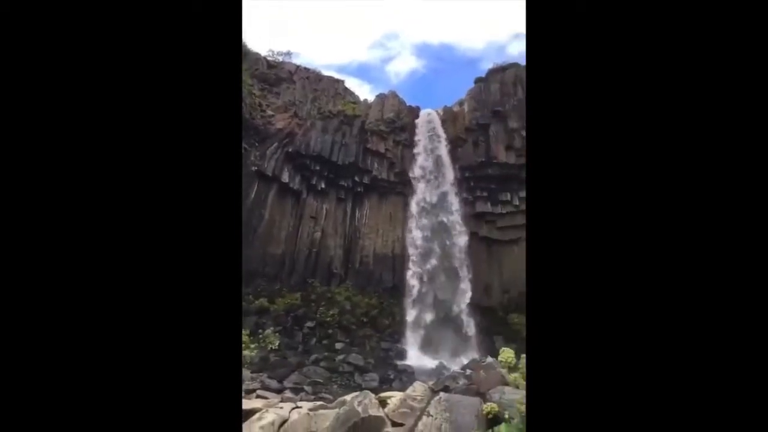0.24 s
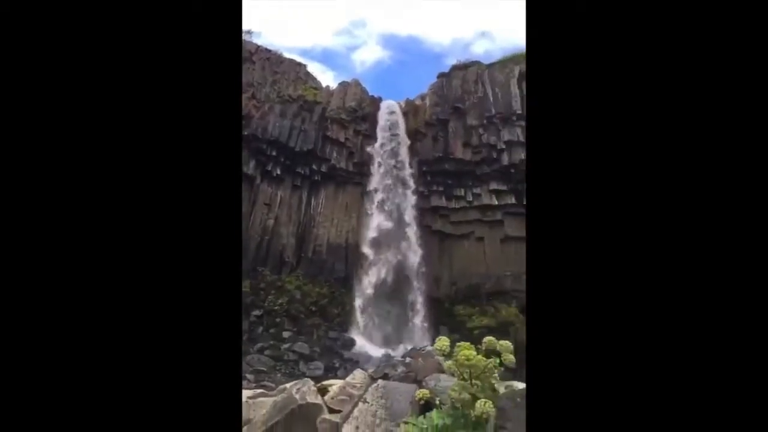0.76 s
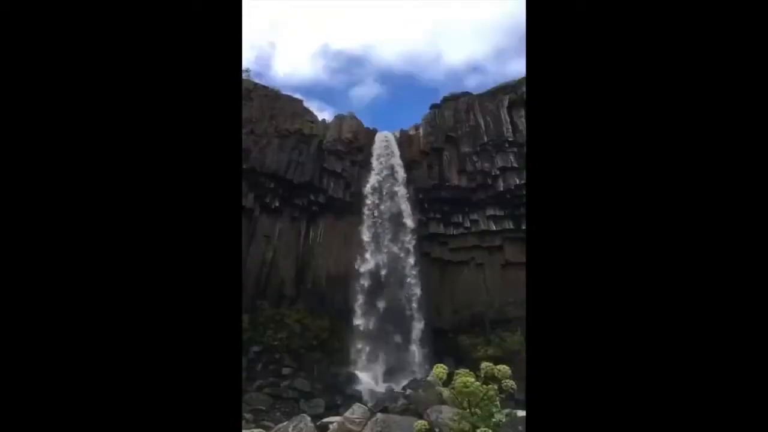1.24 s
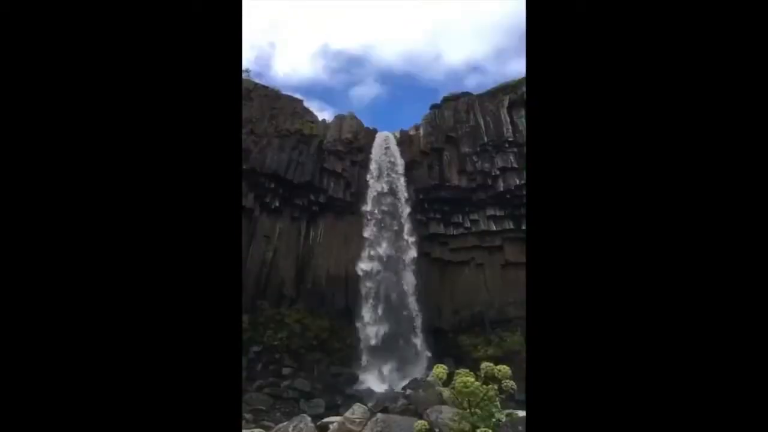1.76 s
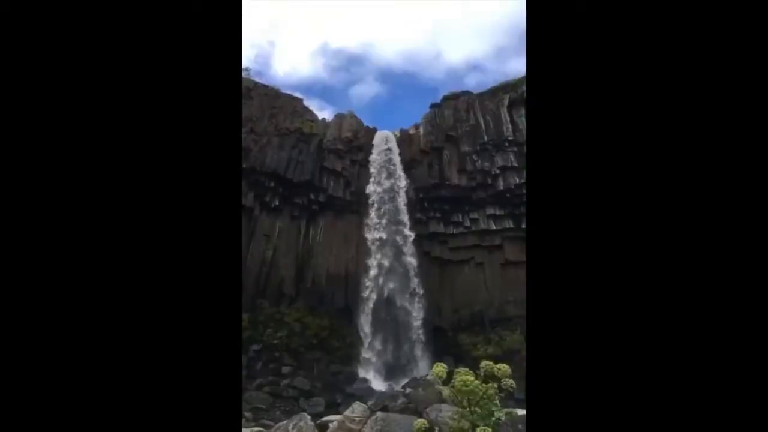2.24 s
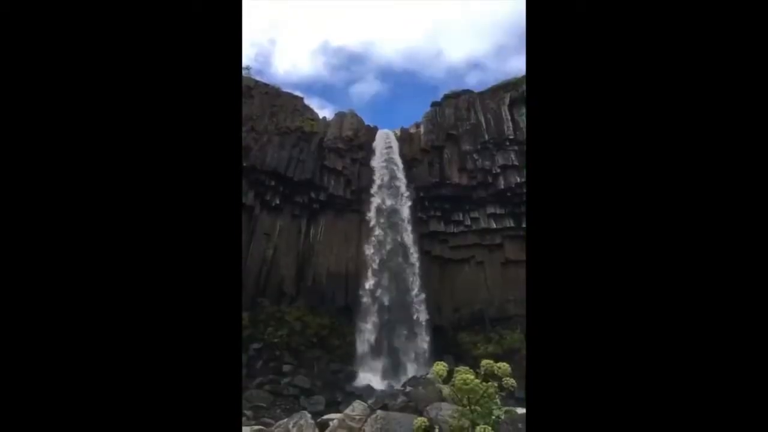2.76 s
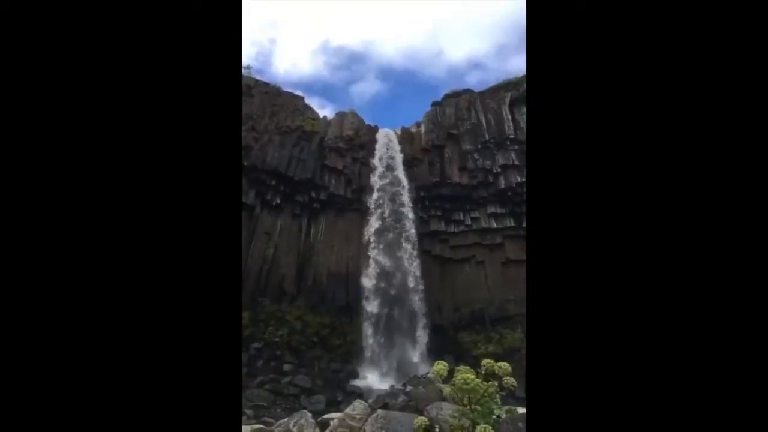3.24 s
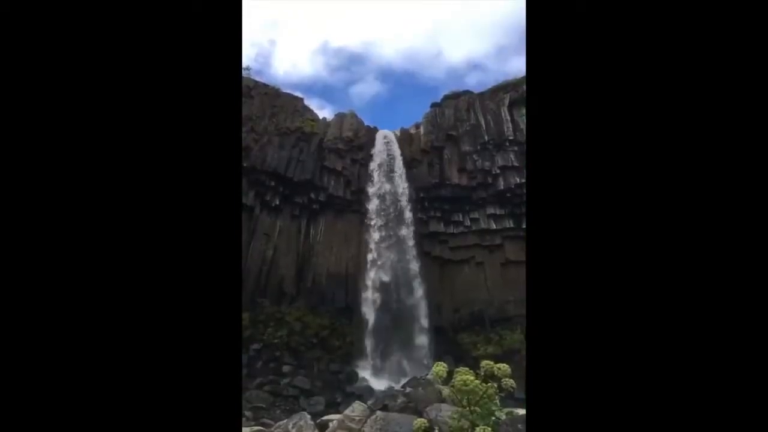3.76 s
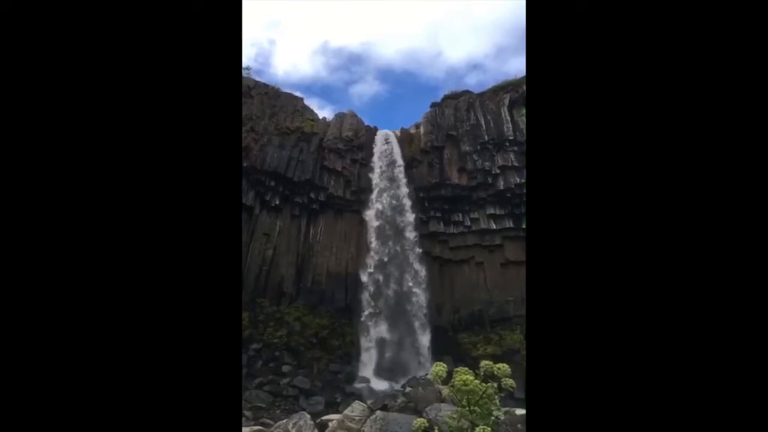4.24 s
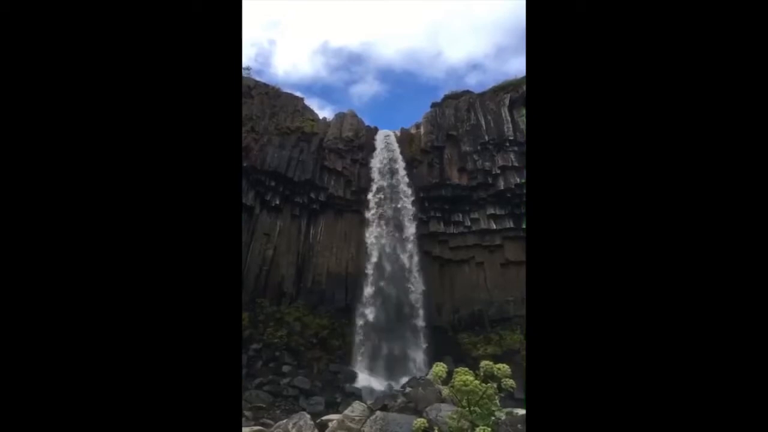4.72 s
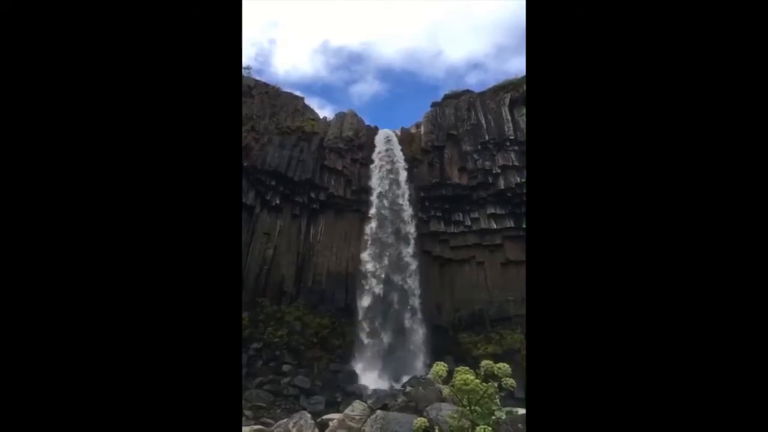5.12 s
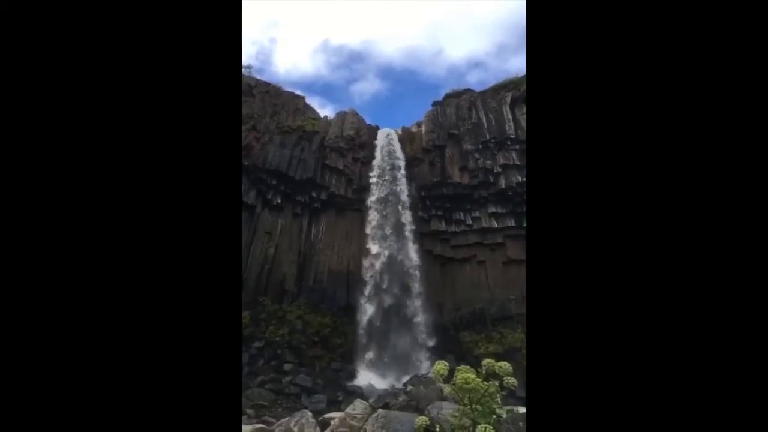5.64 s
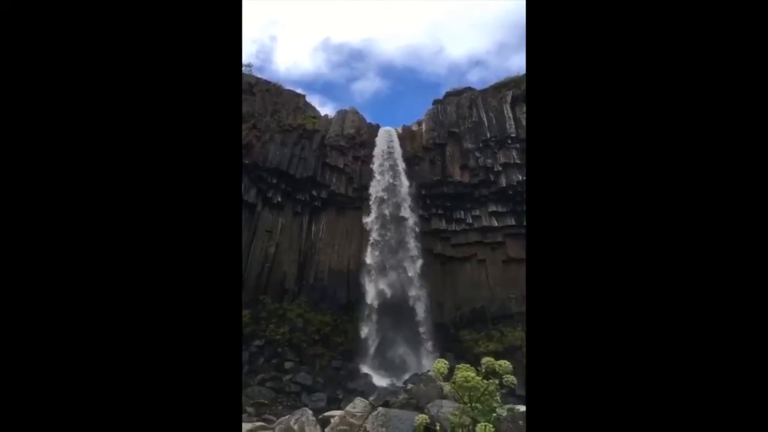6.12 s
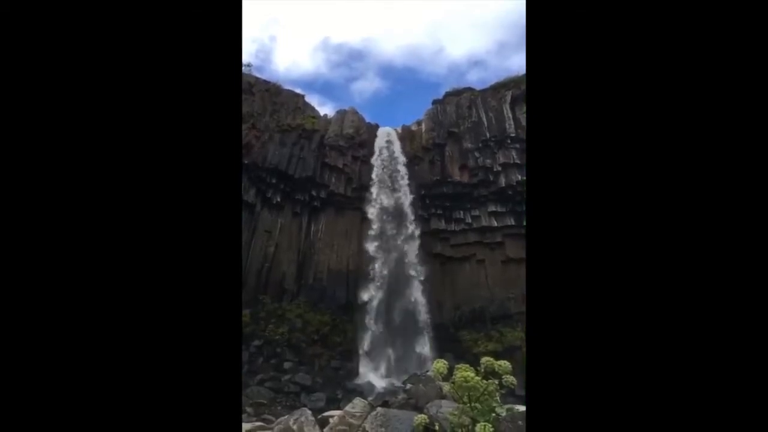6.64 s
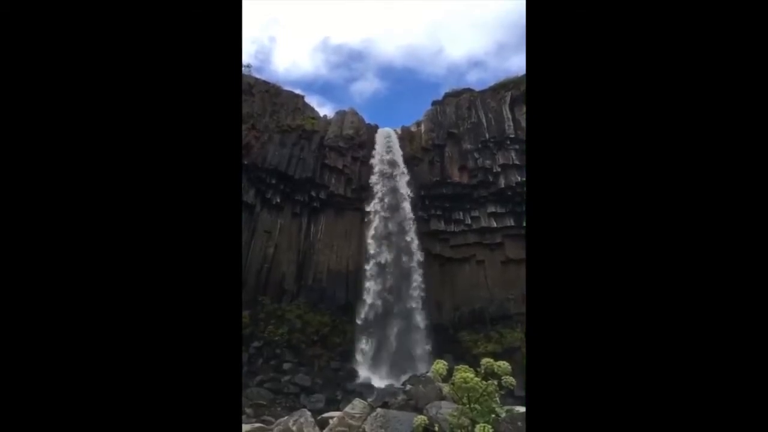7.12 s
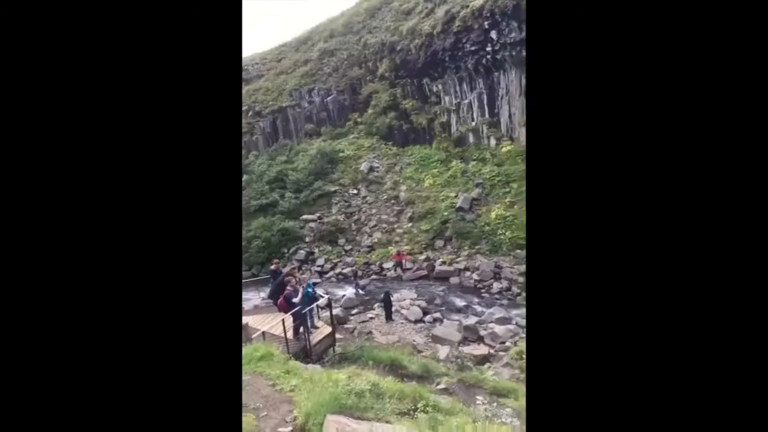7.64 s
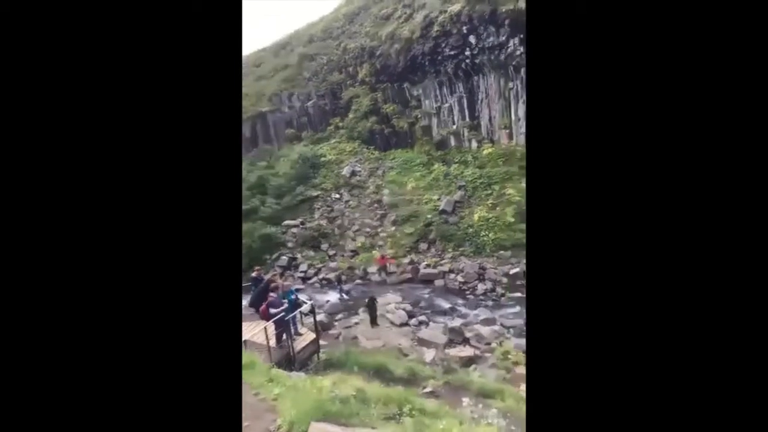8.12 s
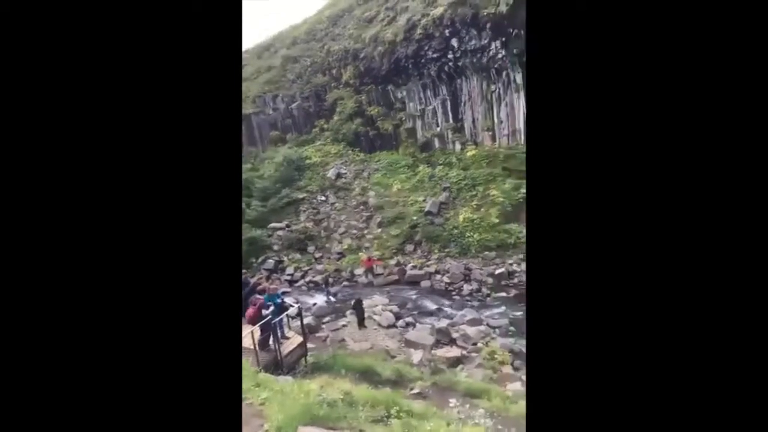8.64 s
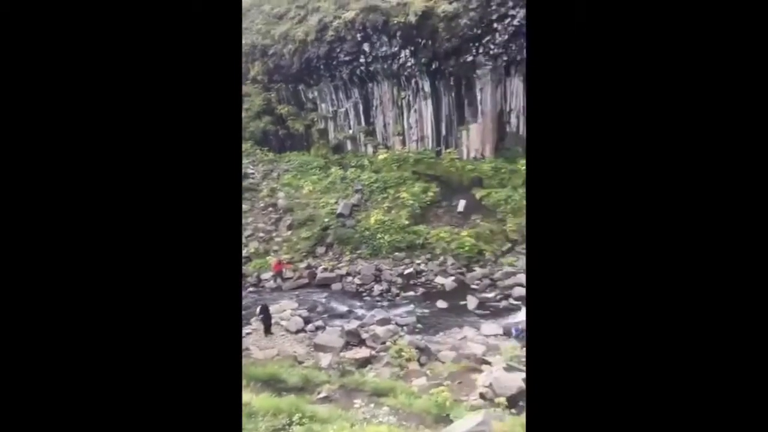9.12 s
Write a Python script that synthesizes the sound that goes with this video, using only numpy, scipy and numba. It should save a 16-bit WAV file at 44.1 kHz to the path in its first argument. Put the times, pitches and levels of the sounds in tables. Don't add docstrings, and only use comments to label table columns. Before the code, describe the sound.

Dense rushing and splattering of falling water with low wind thumps, cut hard by a short dropout and a longer silent pause before a muffled final stretch.

```python
import sys
import numpy as np
from scipy import signal
from scipy.fft import rfft, irfft, next_fast_len
from scipy.io import wavfile
from scipy.ndimage import uniform_filter1d
from numba import njit

SR = 44100
rng = np.random.default_rng(int(sys.argv[2]) if len(sys.argv) > 2 else 0)


def unload_wav(signal):
    wavfile.write(
        sys.argv[1],
        SR,
        np.round(np.clip(np.atleast_2d(signal).T, -1, 1) * 32767).astype(np.int16),
    )


def rack_gain(trim_db):
    fader = np.asarray(trim_db, float)
    return 10 ** (fader / 20)


N = 413658


def unit(x):
    return x / np.sqrt(np.mean(x ** 2))


def walk(n, rate):
    k = int(SR / rate)
    held = np.repeat(rng.standard_normal(n // k + 1), k)
    return 1.32 * uniform_filter1d(uniform_filter1d(held, k), k)[:n]


def band(x, lo_hz, hi_hz):
    f = np.fft.rfftfreq(len(x), 1 / SR)
    return irfft(rfft(x) * ((f >= lo_hz) & (f < hi_hz)), len(x))


def curve(table, t):
    s, *columns = np.transpose(table)
    return [np.interp(t, s, c) for c in columns]


def ticks():
    # t/s, level/dB, low f/Hz, high f/Hz, length/s
    bursts = [
        (7.202, -30, 3000, 13000, .0012),
        (7.2034, -27.5, 2000, 13500, 0.0017),
        (8.6075, -23, 500, 3490, 0.0076),
    ]
    out = np.zeros(N)
    for s, db, lo, hi, length in bursts:
        u = np.arange(-512, 512) / SR
        burst = unit(band(rng.standard_normal(1024), lo, hi)) * np.exp(-(2 * u / length) ** 2)
        middle = int(s * SR)
        out[middle - 512:middle + 512] += rack_gain(db) * burst
    return out


@njit
def ring(n, at, hz, cycles, size, glide):
    y = np.zeros(n + 8000)
    for k in range(len(at)):
        life = min(cycles[k] * SR / hz[k], 2500.)
        p = np.exp(2j * np.pi * hz[k] / SR - 2 / life)
        turn = np.exp(2j * np.pi * glide * hz[k] / SR / life)
        z = size[k] + 0j
        for i in range(int(3 * life)):
            y[at[k] + i] += z.imag
            z, p = z * p, p * turn
    return y[:n]


def froth(n, per_second=5000, spread_db=2.5, bubble_db=0.5):
    when, pitch, loudness, ringing = rng.random((int(per_second * n / SR), 4)).T
    hz = 300 * 14 ** (pitch ** .8)
    size = rack_gain(np.minimum(-spread_db * np.log(1 - loudness), 9))
    bubbles = ring(n, (when * n).astype(np.int64), hz, 5.0 + 16 * ringing, size, .06)
    far = rng.standard_normal(n)
    return rack_gain(bubble_db) * unit(bubbles) * 0.46 + far


def gusty(water, gust_db, steady=0.68):
    rumble = band(water, 0, 150)
    power = uniform_filter1d(rumble ** 2, 2600) / rack_gain(2 * gust_db)
    return water + rumble * ((power + .05) ** (-steady / 2) - 1)


def waterfall(t, roar, spray, spray_db, zone_db, flicker_db=1.36, shared_db=0.67):
    # low f/Hz, high f/Hz
    zones = [
        (20, 150),
        (200, 1800),
        (1800, 5500),
        (5500, 14000),
    ]
    n = len(t)
    f = np.fft.rfftfreq(n, 1 / SR) + 1e-3
    low, high = np.array(roar), np.array(spray) + [0, spray_db]
    shape = np.vstack([low[low[:, 0] < 1850], high[high[:, 0] >= 1850]])
    colour = rack_gain(np.interp(np.log(f), np.log(shape[:, 0]), shape[:, 1])) * (f < 15270)
    gain_db = []
    for db, (lo, hi) in zip(zone_db, zones):
        power = np.sum(colour[(f > lo) & (f < hi)] ** 2) / len(f)
        gain_db.append(db - 10 * np.log10(power))
    spectrum, shared, out = rfft(froth(n)), walk(n, 9), 0
    for centre in np.arange(0, 10.1, 1 / 3):
        mask = np.cos(np.pi / 2 * np.clip(3 * (np.log2(f / 16) - centre), -1, 1)) ** 2
        white = spectrum * np.sqrt(n * np.sum(mask) / np.sum(mask * abs(spectrum) ** 2))
        place = np.interp(centre, [3.1, 3.9, 6.5, 7.0, 8.2, 8.6], [0.5, 1, 1, 2, 2.5, 3])
        k = min(int(place), 2)
        surge_db = gain_db[k] + (place - k) * (gain_db[k + 1] - gain_db[k])
        shared = 0.73 * shared + 0.49 * walk(n, 11)
        db = surge_db + shared_db * shared + flicker_db * walk(n, 24.98)
        out = out + rack_gain(db) * irfft(white * mask * colour, n)
    return gusty(out, zone_db[0])


def scene():
    # start t/s, end t/s
    spots = [
        (0, .9628),
        (1.0105, 7.1942),
        (7.7652, 9.38),
    ]
    # t/s, roar level/dB, spray level/dB, mist level/dB
    surges = [
        [(0.0, -29.5, -33, -38), (0.162, -32.5, -33.5, -39), (0.172, -34.5, -38, -38.5),
         (0.25, -34, -33, -36.5), (0.608, -31.5, -33.5, -38), (0.692, -31, -34, -37), (0.734, -34, -34, -41),
         (0.742, -34, -33, -43), (0.772, -30.5, -32, -40), (0.838, -30.5, -38, -38), (0.868, -33.5, -34.5, -42),
         (0.942, -33.5, -34, -38), (0.96, -34.5, -33, -40)],
        [(1.01, -30, -31, -32), (1.03, -30, -28.5, -34), (1.17, -32.5, -31.5, -36.5), (1.19, -32.5, -32, -33.5),
         (1.31, -29.5, -32, -34.5), (1.46, -29, -32, -32), (1.62, -31.5, -34, -37), (1.72, -27.5, -28.5, -36.5),
         (1.81, -31.5, -31, -33), (1.87, -28.5, -28, -36.5), (1.94, -30.5, -31.5, -34.5),
         (2.25, -29.5, -32, -36), (2.41, -31, -29.5, -34.5), (2.44, -29.5, -33.5, -40),
         (2.51, -29.5, -31.5, -34), (2.61, -29.5, -29.5, -37), (2.65, -33, -24, -33), (2.8, -31.5, -27.5, -34),
         (3.09, -31, -27.5, -32.5), (3.16, -32.5, -31.5, -32.5), (3.2, -28.5, -26, -33),
         (3.23, -31.5, -29.5, -30.5), (3.42, -33, -28.5, -36), (3.49, -31, -27, -33),
         (3.65, -31.5, -29.5, -32.5), (3.7, -28.5, -24, -31.5), (3.78, -33, -32.5, -32.5),
         (3.8, -31.5, -26.5, -32), (4.06, -30, -31, -33), (4.11, -37.5, -28, -33), (4.13, -30.5, -34, -35),
         (4.18, -30, -25.5, -33.5), (4.32, -31, -27.5, -33), (4.42, -30, -26, -34), (4.56, -32, -28.5, -31.5),
         (4.63, -29, -24, -33), (4.66, -35, -29.5, -33), (4.73, -30, -27, -34.5), (4.85, -32.5, -28.5, -32),
         (5.02, -30.5, -31.5, -34.5), (5.16, -31, -32, -33.5), (5.23, -31.5, -33.5, -38),
         (5.31, -31, -30, -34.5), (5.52, -29.5, -31.5, -35), (5.57, -30, -26, -35), (5.66, -30.5, -33.5, -35),
         (5.73, -30, -31, -34.5), (5.75, -30.5, -39.5, -35), (5.78, -30.5, -29.5, -34.5),
         (5.93, -32.5, -36.5, -36.5), (6.05, -30.5, -26.5, -36), (6.07, -35, -32.5, -35),
         (6.14, -28.5, -35, -33.5), (6.17, -30.5, -29.5, -34), (6.43, -30, -31, -34), (6.5, -29.5, -29.5, -37),
         (6.64, -30.5, -29.5, -32.5), (6.72, -30.5, -30, -36.5), (6.86, -30.5, -30.5, -36),
         (6.88, -30, -36, -38), (6.93, -35.5, -33, -35), (6.95, -32, -27, -32.5), (6.98, -31.5, -36, -37),
         (7.02, -30.5, -29, -36.5), (7.19, -31, -32, -34)],
        [(7.77, -32.5, -36.5, -40), (7.882, -36.5, -37, -38.5), (7.922, -30, -36, -41), (7.958, -34, -41, -39),
         (8.012, -33, -36, -37), (8.06, -32, -39, -37.5), (8.088, -33, -32, -36), (8.124, -31.5, -35, -38.5),
         (8.576, -34.5, -36, -42), (8.594, -42, -38, -42), (8.604, -32, -37, -40), (8.684, -38, -38, -42),
         (8.716, -31, -30, -41), (8.742, -38, -39, -41), (8.796, -31.5, -32, -38), (8.804, -34.5, -37, -41.5),
         (9.284, -34.5, -33.5, -36.5), (9.338, -31.5, -36, -39), (9.352, -36, -36, -35), (9.38, -35, -29, -43)],
    ]
    # t/s, level/dB
    gusts = [
        [(0.0, -36), (0.066, -32), (0.1, -36), (0.32, -40), (0.402, -29.5), (0.454, -52), (0.474, -39),
         (0.644, -34.5), (0.696, -49), (0.73, -32.5), (0.794, -34), (0.834, -54), (0.878, -37), (0.938, -35),
         (0.96, -45)],
        [(1.01, -37), (1.03, -41), (1.06, -31), (1.24, -41.5), (1.32, -30), (1.36, -32), (1.56, -35.5),
         (1.67, -44.5), (1.7, -30.5), (1.77, -30.5), (1.84, -47.5), (1.87, -31.5), (1.94, -40), (1.98, -33.5),
         (2.11, -34), (2.13, -30.5), (2.18, -38.5), (2.32, -32), (2.37, -36), (2.47, -30), (2.51, -42),
         (2.6, -31), (2.77, -39.5), (2.82, -38.5), (2.86, -38.5), (2.89, -30), (2.97, -40), (3.08, -32.5),
         (3.09, -40.5), (3.23, -36.5), (3.34, -30.5), (3.37, -43.5), (3.42, -28), (3.47, -41.5), (3.51, -21.5),
         (3.58, -45.5), (3.59, -34), (3.77, -34), (3.82, -41.5), (3.85, -25.5), (3.87, -28), (3.9, -33.5),
         (4.16, -35), (4.21, -27), (4.28, -40.5), (4.32, -31.5), (4.47, -26), (4.51, -37), (4.64, -29),
         (4.7, -43.5), (4.73, -34), (4.88, -38.5), (4.92, -28), (5.04, -37.5), (5.16, -27.5), (5.18, -37),
         (5.25, -28), (5.33, -44), (5.36, -30.5), (5.43, -35.5), (5.49, -26), (5.52, -39), (5.59, -31),
         (5.62, -39.5), (5.66, -20), (5.69, -39), (5.79, -30), (6.0, -34), (6.09, -39.5), (6.28, -30.5),
         (6.31, -43), (6.33, -32.5), (6.52, -30), (6.57, -39.5), (6.67, -32.5), (7.05, -36), (7.09, -36),
         (7.19, -33)],
        [(7.77, -38), (7.84, -42), (7.858, -30), (7.958, -38), (8.136, -27), (8.16, -35), (8.226, -22),
         (8.254, -33), (8.284, -25), (8.338, -42), (8.496, -36), (8.616, -25), (8.67, -38), (8.706, -39),
         (8.782, -40), (8.81, -36), (8.988, -36), (9.02, -44), (9.056, -37), (9.214, -35), (9.262, -44),
         (9.334, -36), (9.38, -48)],
    ]
    # f/Hz, level/dB per Hz
    roars = [
        [(15, -53.5), (25, -24), (40, -6), (66, 1.5), (133, -7.5), (157, -4), (207, -9), (300, -6.5),
         (459, -13), (543, -7.5), (786, -9.5), (1160, -7), (2100, -9), (2730, -39), (4620, -120)],
        [(15, -35.5), (25, -3), (54, 2), (92, -2.5), (160, -5), (199, -11), (305, -10), (442, -13.5),
         (553, -9.5), (758, -12), (964, -9.5), (1300, -10.5), (1420, -11.5), (1880, -14), (2100, -13),
         (2730, -30.5), (4620, -120)],
        [(15, -33), (25, -2), (58, -2.5), (121, -10), (157, -15.5), (215, -12.5), (368, -15.5), (468, -18),
         (513, -13.5), (831, -14.5), (946, -16), (1480, -15.5), (2100, -30), (2730, -41.5), (4620, -120)],
    ]
    # f/Hz, level/dB per Hz
    sprays = [
        [(940, -30), (1600, 0), (1900, 3), (2590, 3), (3810, -4), (4220, -4.5), (4770, -7.5), (5710, -10),
         (7020, -13.5), (7790, -15.5), (9580, -15.5), (10300, -20), (11600, -17), (12100, -19), (15200, -33.5)],
        [(940, -33), (1600, -3), (1910, -6), (2330, 0), (2980, -6), (4640, -4.5), (5820, -12.5), (6960, -14),
         (11600, -11.5), (13300, -17.5), (15200, -33.5)],
        [(940, -30), (1600, 0), (1690, -4), (1970, -4), (2270, -6), (2790, -8), (3120, -5), (4100, -7.5),
         (4950, -9), (6270, -9), (8010, -12.5), (9400, -13), (12500, -19.5), (13800, -23), (15200, -34)],
    ]
    spray_levels = [-11, -6.5, -19.5]
    # level/dB, t60/s
    remnants = [
        (-50, 0.021),
        (-10.5, 0.047),
        (-60, .01),
    ]
    out = ticks()
    views = zip(spots, surges, gusts, roars, sprays, spray_levels, remnants)
    for (t0, t1), surge, gust, roar, spray, spray_db, (db, t60) in views:
        i = int(t0 * SR)
        t = np.arange(i, i + next_fast_len(int((t1 - t0 + .06) * SR), True)) / SR
        remnant = rack_gain(db - 60 * (t - t1) / t60) * (t < t1 + t60)
        gate = np.where(t < t1, 1, remnant)
        water = gate * waterfall(t, roar, spray, spray_db, curve(gust, t) + curve(surge, t))
        out[i:i + len(t)] += water[:N - i]
    return np.array([out, out])


def band_limit(x):
    return signal.sosfilt(signal.butter(12, 15800, fs=SR, output="sos"), x)


def record(dry):
    return band_limit(dry)


dry = scene()
out = record(dry)
unload_wav(out)
```